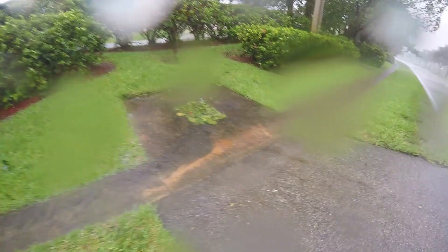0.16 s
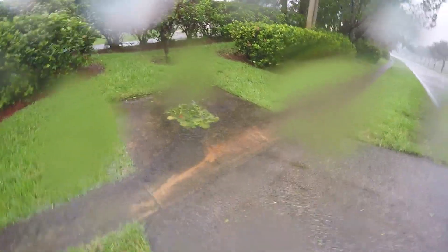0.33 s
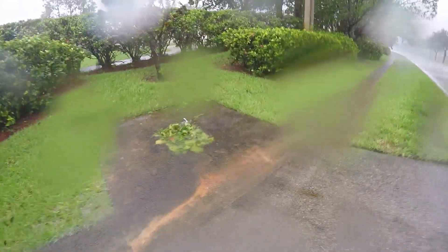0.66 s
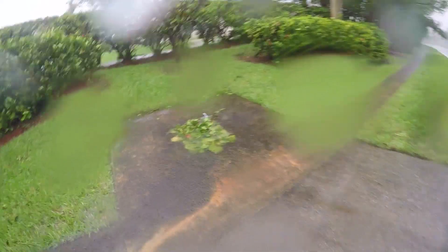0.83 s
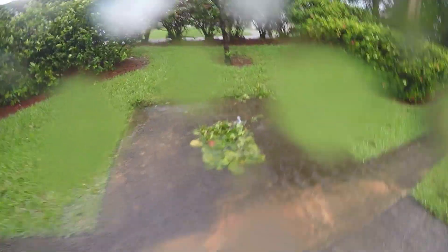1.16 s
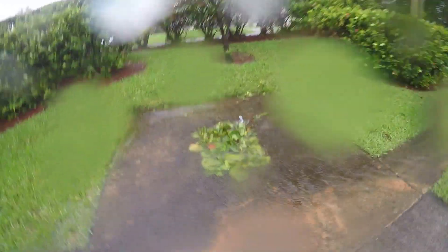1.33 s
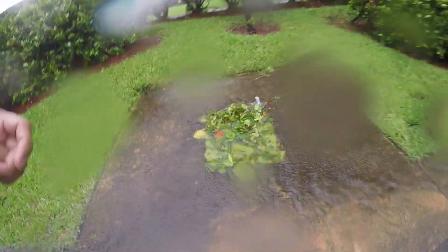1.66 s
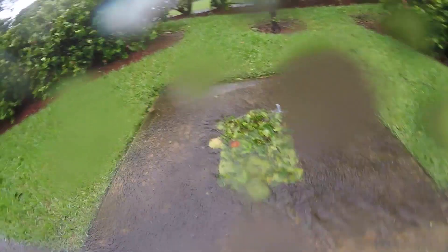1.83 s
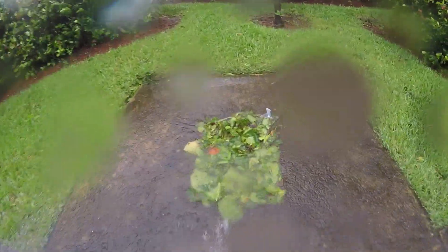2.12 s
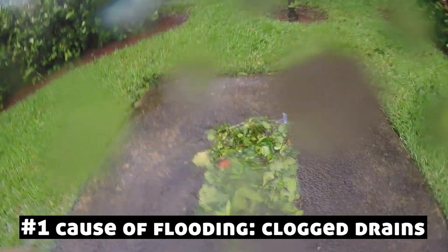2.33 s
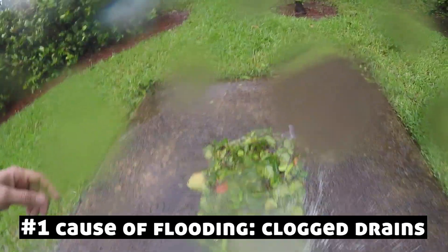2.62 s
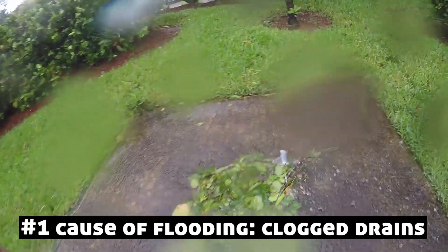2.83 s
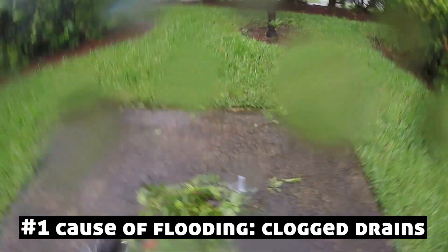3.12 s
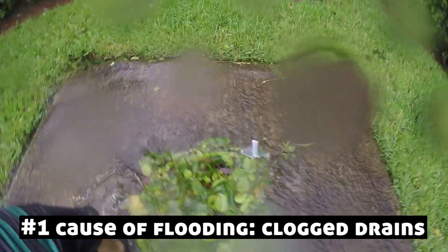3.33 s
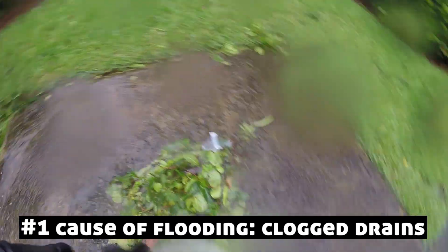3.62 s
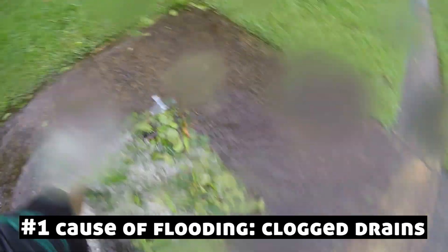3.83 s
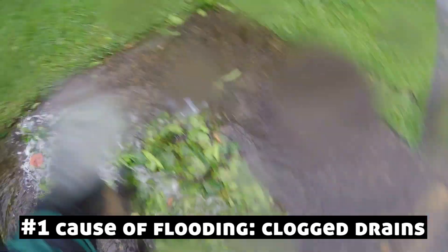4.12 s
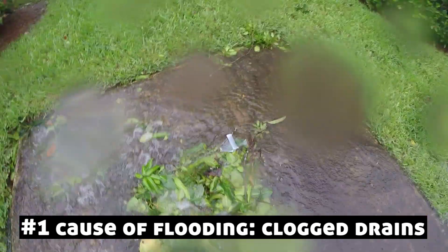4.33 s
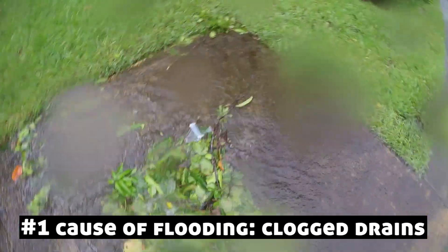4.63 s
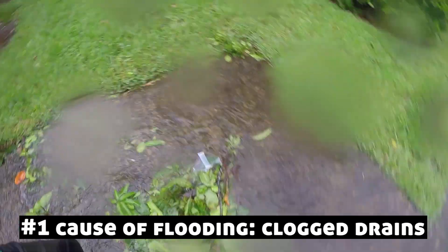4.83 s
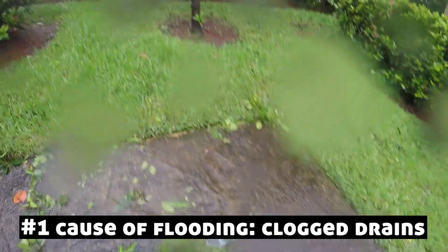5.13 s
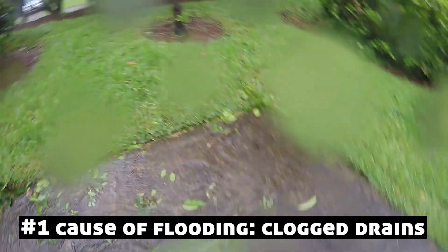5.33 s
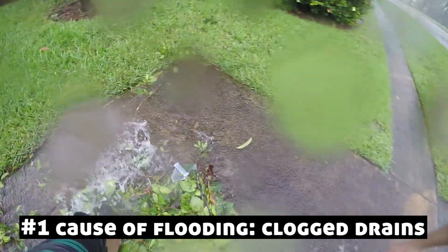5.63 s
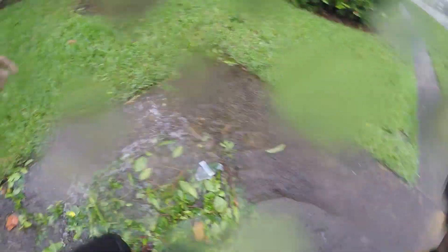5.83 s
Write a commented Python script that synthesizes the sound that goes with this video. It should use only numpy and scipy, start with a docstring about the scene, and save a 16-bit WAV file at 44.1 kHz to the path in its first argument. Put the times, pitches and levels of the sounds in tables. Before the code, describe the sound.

Outdoor rain beside a flooded drain, heard from inside a hard waterproof shell, so drops are very close and the water is muffled and resonant. A sharp knock starts at 0 s, then fainter taps quicken from 0.3 s into a flurry around 0.75-1.1 s. A tiny spray brushes the shell near 1.25 s and a lull follows. From 2.0 to 2.6 s comes the densest, loudest burst of plastic clacks, the hardest around 2.1 s and slightly overloaded. Taps then become sparse, with clear ones near 3.5 and 5.8 s. Around 3.8 and 5.4 s water and wet leaves are swept off the drain in soft sloshes, each landing brighter about 0.3 s later. Low plops bubble near 3.6-3.7 and 5.0-5.5 s; faint spray passes at 4.4 s. Steady rain wash, fine ticking and low wind buffeting persist, with slow gust thumps near 0.9 and 3.3 s.

```python
"""Raindrops knock hard on a waterproof shell around the listener, in flurries, beside a flooded street drain.
Each drop rings the shell and the spot it hits; fine drizzle ticks between, and spray crosses the shell.
Rain washes the ground as filtered noise; near 3.8 and 5.4 s water and wet leaves are swept off the grate.
Water sounds enter through the shell's resonances, with bubbles as rising sines.
Wind, made of coloured noise and two slow swings, rumbles underneath."""
import sys
import numpy as np
from scipy import signal
from scipy.fft import rfft, irfft
from scipy.io import wavfile
from scipy.ndimage import uniform_filter1d

SR = 44100
rng = np.random.default_rng(int(sys.argv[2]) if len(sys.argv) > 2 else 0)


def unload_audio(sound):
    """Save the sound as a 16-bit wav file, at the path given as the first command line argument."""
    columns = np.transpose(np.atleast_2d(sound))
    # keep every value between -1 and 1, then stretch to whole-number steps
    steps = np.round(np.clip(columns, -1, 1) * 32767)
    wavfile.write(sys.argv[1], SR, steps.astype(np.int16))


N = 263718  # length [samples]
TOP_HZ = 15200  # upper edge of the sound


def undb(db):
    """Decibels to gain."""
    return 10 ** (np.asarray(db) / 20)


def unit(x):
    """Scale to rms 1."""
    return x / np.sqrt(np.mean(x ** 2) + 1e-20)


def curves(table):
    """Each level column of a table, interpolated to every sample."""
    times, *columns = np.transpose(table)
    return [np.interp(np.arange(N) / SR, times, column) for column in columns]


def band(x, lo_hz, hi_hz, order=3):
    """Causal band-pass."""
    edges = [lo_hz, min(hi_hz, .45 * SR)]
    return signal.sosfilt(signal.butter(order, edges, "band", fs=SR, output="sos"), x)


def walk(rate):
    """Smooth random wandering of rms near 1, from `rate` new values a second."""
    k = int(SR / rate)
    steps = np.repeat(rng.standard_normal(N // k + 1), k)
    smooth = uniform_filter1d(uniform_filter1d(steps, k), k)
    return unit(smooth)[:N]


def patter(rate, spread_db):
    """Random tiny impacts, `rate` a second, most of them faint and a few strong."""
    hit = rng.random(N) < rate / SR
    size = undb(spread_db * np.minimum(rng.exponential(size=N), 5))
    return unit(hit * size * rng.standard_normal(N))


# drops on the shell: (time [s], ring of the struck spot [Hz], level [dB],
# spread to each side of the ring [octaves], spray relative to the level, before its trim [dB])
DROPS = [(0.0003,1770,-16,0.88,-23.5), (0.127,490,-42.5,0.5,-23), (0.2586,4900,-44,0.37,-11),
         (0.3372,4080,-36.5,0.99,1.5), (0.3436,670,-36.5,1.45,-20), (0.3465,2340,-31.5,0.88,-21),
         (0.3917,2500,-27.5,0.21,-6), (0.476,2240,-23.5,1,-18), (0.5628,2650,-24.5,0.88,-7.5),
         (0.617,2770,-30.5,0.77,-9.5), (0.752,3480,-29,1.6,1), (0.755,2150,-24,1.3,1.5),
         (0.8314,2550,-14.5,0.73,-11), (0.867,650,-27,1.05,-22.5), (0.9298,1620,-21.5,0.69,-14),
         (0.9364,1470,-25.5,0.93,-24), (0.941,2730,-26,1.1,-6), (0.9647,1590,-35,0.46,-21),
         (0.9854,3030,-22,0.86,-9), (1.028,1890,-24,1.07,-19), (1.0459,4220,-30,1.14,-1.5),
         (1.0961,2050,-17.5,1.16,-11), (1.221,1920,-39,0.52,-26), (1.8246,4850,-32.5,1.27,-6),
         (2.0076,3570,-16.5,1.16,-5), (2.0225,4500,-39,1.1,-12), (2.084,2440,-5.5,0.64,-25),
         (2.145,1160,-17.5,1.1,-20), (2.1795,3540,-16,0.85,-11), (2.263,3180,-10,0.99,-1.5),
         (2.2706,1910,-30.5,0.9,-8), (2.3273,4157,-10,1.06,-3), (2.368,4900,-30,1,-7),
         (2.3763,3530,-40,.9,1), (2.3832,1980,-17,0.63,-12), (2.4353,1940,-15.5,.4,-16),
         (2.481,3060,-19,0.93,-6), (2.504,5040,-29,0.93,-3), (2.542,1200,-40,0.89,-17),
         (2.553,4360,-34,0.97,-8), (2.5675,4250,-36.5,0.7,-5), (2.598,4900,-38,.8,-1),
         (2.6156,2840,-30.5,0.93,-2.5), (2.7183,3420,-25,0.97,-7.5), (2.787,1760,-39,0.26,-19),
         (2.856,3140,-30.5,0.88,-2.5), (2.99,2120,-34.5,0.41,-7), (3.0069,1700,-43,.7,-6),
         (3.0187,4800,-28.5,0.94,-1), (3.0735,2340,-26.5,0.51,-13), (3.2496,2500,-47,1.7,-22),
         (3.528,2600,-20,0.67,-11), (3.8404,2670,-31,1.2,-8), (4.38,2400,-28,0.88,-23),
         (4.5942,1850,-40.5,0.32,-27), (4.787,1790,-39.5,1.2,-13), (5.245,2500,-39.5,1,-15),
         (5.3584,1900,-31.5,1,-6.5), (5.4642,2070,-23.5,0.91,-7.5), (5.5483,2670,-32.5,1.3,-9.5),
         (5.842,2220,-19,0.86,-5)]
# ringing modes of the shell: (frequency [Hz], 60 dB decay time [s], level [dB])
SHELL = [(477, 0.024, -20), (667, 0.0046, -11.5), (1036, 0.0076, -18.5), (1360, .016, -2.5),
         (1613, 0.013, -3), (1950, 0.014, -2.5), (2342, 0.0085, -1.5), (2699, 0.011, -1), (3705, 0.0089, 0),
         (4460, 0.01, -1.5), (5450, 0.0049, -1), (6520, 0.0069, -6), (8140, 0.0057, -10),
         (9680, 0.0048, -15.5), (13500, 0.0039, -17.5), (14700, 0.0034, -24)]
# dull push of the water, relative to the knock: more when a drop rings low or splats wide
THUD_DB, THUD_AT_HZ, THUD_DB_PER_OCTAVE, THUD_DB_PER_SPREAD = -17, 2380, -3.5, 10


def rain_on_shell(ring_db=9, ring_t60=0.004, spot_db=3, crack_db=2, crack_t60=0.002,
                  contact_s=0.0001, push_db=-20, push_t60=0.0056, spray_trim_db=-1):
    """Each drop rings the shell's modes and the spot it hits, and bursts with a short crack."""
    hz, t60, db = np.transpose(SHELL)[:, :, None]
    t = np.arange(int(.04 * SR)) / SR
    fade = lambda seconds: np.exp(-np.log(1000) * t / seconds)
    out = np.zeros(N + SR)
    for s, spot_hz, level_db, spread, spray_db in DROPS:
        weight, detune, side = rng.standard_normal((3, len(SHELL), 1))
        # the place of the hit sets how strongly, and which way, each mode is pushed
        strength = np.sign(side) * undb(db + spot_db * weight)
        modes = strength * fade(t60) * np.sin(2 * np.pi * hz * (1 + 0.029 * detune) * t)
        spot = undb(ring_db) * fade(ring_t60) * np.sin(2 * np.pi * spot_hz * t)
        burst = fade(crack_t60) * rng.standard_normal(len(t))
        crack = undb(crack_db) * band(burst, 1000, SR / 2, order=1)
        # the weight of the water gives one short push
        push = undb(push_db) * fade(push_t60)
        blow = (modes.sum(axis=0) + spot + crack + push) * (1 - np.exp(-t / contact_s))

        # a knock around the spot's pitch, a dull thud and bright spray
        width = 2 ** max(spread, .1)
        knock = unit(band(blow, spot_hz / width, spot_hz * width, order=2))
        thud = unit(band(blow, 118, 787))
        pitch_db = THUD_DB_PER_OCTAVE * np.log2(spot_hz / THUD_AT_HZ)
        thud_db = THUD_DB + pitch_db + THUD_DB_PER_SPREAD * (spread - 1)
        spray = unit(band(blow, 6400, TOP_HZ, order=4))
        drop = knock + undb(thud_db) * thud + undb(spray_db + spray_trim_db) * spray
        # the level is the rms of the knock as if its energy filled 5 ms
        start = int(s * SR)
        out[start:start + len(t)] += drop * np.sqrt(.005 / t[-1]) * undb(level_db)
    return out[:N]


def drizzle(rate=90, spread_db=2.5, level_db=-59.5):
    """Fine droplets tick faintly and dully, ringing the shell's modes at six spots."""
    t = np.arange(int(.03 * SR)) / SR
    ticks = 0
    for spot in range(6):
        ring = 0
        for hz, t60, db in SHELL:
            fading = undb(db - 60 * t / t60)
            ring = ring + rng.standard_normal() * fading * np.sin(2 * np.pi * hz * t)
        ticks = ticks + signal.fftconvolve(patter(rate / 6, spread_db), unit(ring))[:N]
    return unit(band(ticks, 170, 3700, order=1)) * undb(level_db)


# resonances that let outside sound in: (frequency [Hz], width [Hz], level [dB])
LEAKS = [(944, 74, -10), (1620, 140, -5.5), (1852, 150, 1), (2200, 680, -17.5), (2427, 530, -4.5),
         (3580, 290, -12.5), (4485, 380, -6.5), (5650, 590, -17.5), (6330, 1300, -15), (9200, 1500, -24),
         (12600, 2200, -27.5)]


def through_shell(x, wall_hz=1300):
    """The shell blocks the lows and lets the rest in at its resonances."""
    f = np.maximum(np.fft.rfftfreq(N, 1 / SR), 1)
    power = sum(undb(db) ** 2 / (1 + ((f - hz) / width) ** 2) ** 2 for hz, width, db in LEAKS)
    power = power / (1 + (wall_hz / f) ** 4)
    return irfft(rfft(x) * np.sqrt(power), N)


# sprays of water across the shell: (time [s], half length [s], level [dB], added treble [dB])
SPRAYS = [(1.241, 0.0052, -39, 26), (1.258, 0.0072, -46, 3), (4.412, 0.0085, -41, -27),
          (4.425, 0.0053, -49, -10), (4.443, 0.0097, -39, -40), (4.458, 0.0032, -57, -16)]


def sprays(bright_hz=4000):
    """Brief swells of dense droplet impacts, each with its own share of treble."""
    body = unit(through_shell(patter(4200, 1.1)))
    top = band(body, bright_hz, SR / 2, order=2)
    t = np.arange(N) / SR
    out = 0
    for s, half_s, db, bright_db in SPRAYS:
        swell = undb(db) * np.exp(-((t - s) / half_s) ** 2)
        out = out + swell * unit(body + undb(bright_db) * top)
    return out


# rain on the flooded ground, before the trims in water(): (time [s], level [dB])
WASH = [(0, -55), (0.55, -54), (0.95, -51.5), (1.38, -55), (1.87, -51.5), (2.3, -53.5), (2.62, -55.5),
        (3.05, -50), (4.3, -51.5), (4.6, -52), (5.15, -52), (5.98, -53.5)]
WASH_FIZZ_DB = -5.5  # treble relative to the wash
# scoops of water and leaves off the grate: (time [s], slosh level [dB], landing level [dB])
SCOOPS = [(3.82, -45, -48), (5.41, -45.5, -48.5)]
SCOOP_S, SCOOP_FIZZ_DB = 0.14, -10  # half length of the slosh; its relative treble
# the thrown water lands after its flight, brighter than the slosh
FLIGHT_S, LANDING_S, LANDING_FIZZ_DB = 0.28, 0.13, -5.5
CHURN_HZ, CHURN_DB = 21.85, 0.9  # the thrown water churns unevenly


def water_levels():
    """Wash and fizz in dB: the rain's power plus a slosh and a landing for each scoop."""
    t = np.arange(N) / SR
    wash = undb(curves(WASH)[0]) ** 2
    fizz = wash * undb(WASH_FIZZ_DB) ** 2
    churn_db = CHURN_DB * walk(CHURN_HZ)
    for s, slosh_db, landing_db in SCOOPS:
        slosh = undb(slosh_db + churn_db) ** 2 * np.exp(-((t - s) / SCOOP_S) ** 2)
        landing = undb(landing_db + churn_db) ** 2 * np.exp(-((t - s - FLIGHT_S) / LANDING_S) ** 2)
        wash = wash + slosh + landing
        fizz = fizz + slosh * undb(SCOOP_FIZZ_DB) ** 2 + landing * undb(LANDING_FIZZ_DB) ** 2
    return 10 * np.log10(wash), 10 * np.log10(fizz)


def splashes():
    """Countless splashes heard through the shell: steady noise with an equal part of grains."""
    return through_shell(rng.standard_normal(N) + patter(1800, 2.0))


def water(wash_trim_db=0.27, fizz_trim_db=-1.23, split_hz=4200, flicker_db=1.67):
    """Splashing on the flooded ground and off the grate, as a wash below a bright fizz."""
    wash_level, fizz_level = water_levels()
    wash, fizz = splashes(), splashes()
    # each is levelled by the band where it is strongest to the ear
    wash = wash / np.std(band(wash, 1400, 3000))
    fizz = fizz / np.std(band(fizz, 5200, 12000))
    wash_gain = undb(wash_level + wash_trim_db + flicker_db * walk(21.72))
    fizz_gain = undb(fizz_level + fizz_trim_db + flicker_db * walk(24.6))
    wash = band(wash, 300, split_hz, order=2) * wash_gain
    fizz = band(fizz, split_hz, SR / 2, order=2) * fizz_gain
    return wash + fizz


def bubble(hz, cycles, rise):
    """A bubble rings and dies away over some cycles while its pitch rises."""
    age = np.arange(int(cycles / hz * SR)) / SR * hz / cycles
    envelope = (1 - np.exp(-20 * age)) * np.exp(-np.log(300) * age)
    return envelope * np.sin(2 * np.pi * cycles * age * (1 + rise * age / 2))


# plops in the water at the grate: (time [s], starting pitch [Hz], level before the bubble's envelope [dB])
PLOPS = [(3.603, 640, -42.5), (3.742, 686, -44), (4.326, 510, -64), (5.038, 670, -44), (5.087, 480, -49),
         (5.138, 600, -43.5), (5.261, 530, -41), (5.506, 534, -48)]


def gurgle(plop_cycles=16, fine_cycles=30, rise=0.11, fine_db=-8, spread_db=4, count=420):
    """A few low plops, and many small bubbles whose level follows the moving water."""
    plops, fine = np.zeros((2, N + SR))
    for s, hz, db in PLOPS:
        ring = bubble(hz, plop_cycles, rise)
        start = int(s * SR)
        plops[start:start + len(ring)] += undb(db) * ring
    for when, pitch, size in rng.random((count, 3)):
        ring = bubble(1200 * 4 ** pitch, fine_cycles, rise)
        start = int(when * N)
        fine[start:start + len(ring)] += undb(-spread_db * np.log(size + 0.02)) * ring
    return plops[:N] + unit(through_shell(fine[:N])) * undb(water_levels()[0] + fine_db)


def coloured(points):
    """Noise of rms 1 with a spectrum drawn through (frequency [Hz], level [dB]) points."""
    hz, db = np.transpose(points)
    f = np.maximum(np.fft.rfftfreq(N, 1 / SR), 1)
    gain = undb(np.interp(np.log(f), np.log(hz), db))
    gain = gain / (1 + (f / hz[-1]) ** 4)  # roll off above the last point
    return unit(irfft(rfft(rng.standard_normal(N)) * gain, N))


# air, before the trims in wind(): (time [s], buffeting level [dB], dull rush level [dB])
AIR = [(0.0, -48.5, -63.5), (0.58, -49, -57.5), (0.87, -53, -63), (1.33, -45, -60.5), (2.13, -47, -55),
       (2.88, -54.5, -67), (3.33, -52.5, -64.5), (3.78, -48.5, -61), (4.21, -53, -65.5), (5.48, -50, -60.5),
       (5.98, -52, -69)]
# spectrum of the buffeting: (frequency [Hz], density [dB per Hz])
BUFFET = [(8, -10), (16, 6.5), (33, -5), (50, -5.5), (70, -12), (110, -20.5), (220, -31), (500, -64)]
# spectrum of the dull rush: (frequency [Hz], density [dB per Hz])
RUSH = [(100, -0.5), (220, 0), (370, -3), (480, 0), (680, -1), (800, -3), (1200, -14.5), (2000, -3)]
# gusts that push on the shell: (time [s], frequency [Hz], half length [s], level [dB])
GUSTS = [(0.861, 21, 0.042, -19.5), (3.271, 14, 0.074, -19.5)]
GUST_BUFFET_DB, GUST_BUFFET_S = 9, 0.13  # buffeting stirred up by a gust; its half length


def wind(buffet_trim_db=4, rush_trim_db=2, gusty_db=3.3):
    """Air buffets the shell over a dull rush of the storm; two gusts rock it slowly."""
    buffet_level, rush_level = curves(AIR)
    rocking = 0
    for s, hz, half_s, db in GUSTS:
        t = np.arange(N) / SR - s
        rocking = rocking + undb(db) * np.exp(-(t / half_s) ** 2) * np.cos(2 * np.pi * hz * t)
        buffet_level = buffet_level + GUST_BUFFET_DB * np.exp(-(t / GUST_BUFFET_S) ** 2)
    buffet = coloured(BUFFET) * undb(buffet_level + buffet_trim_db + gusty_db * walk(30))
    rush = coloured(RUSH) * undb(rush_level + rush_trim_db)
    return rocking + buffet + rush


def scene():
    """Drops on the shell in front of water and wind."""
    return (rain_on_shell() + drizzle() + sprays() + water() + gurgle() + wind())[None]


def record(dry):
    """The hardest drops overload the microphone; the top is cut."""
    ceiling = .75
    clipped = dry / (1 + (dry / ceiling) ** 8) ** (1 / 8)
    return signal.sosfilt(signal.ellip(8, .2, 70, TOP_HZ, fs=SR, output="sos"), clipped)


dry = scene()
out = record(dry)
unload_audio(out)
```